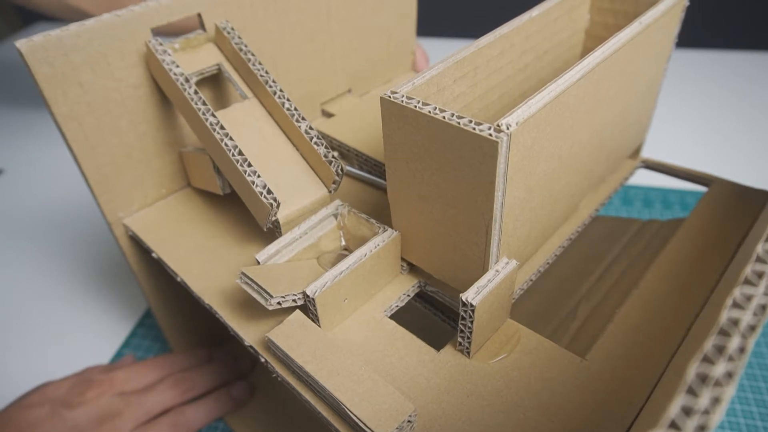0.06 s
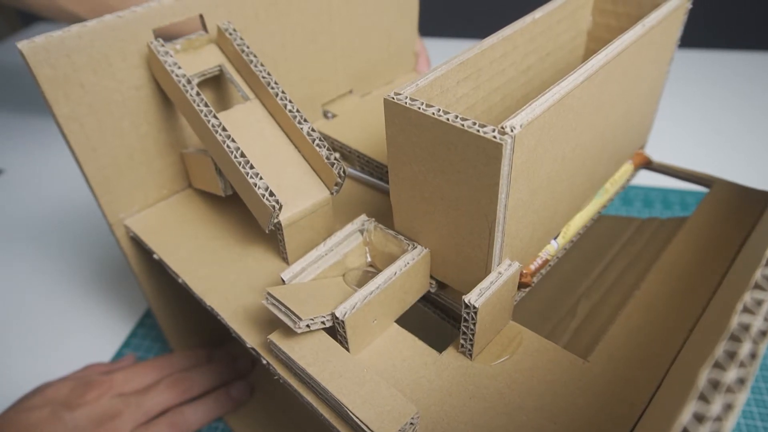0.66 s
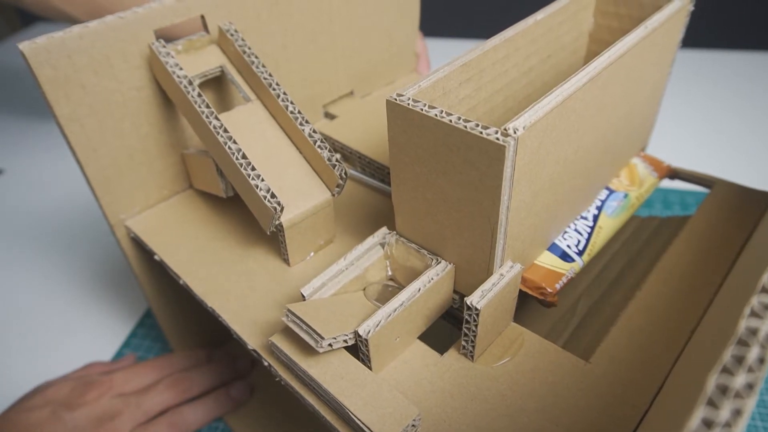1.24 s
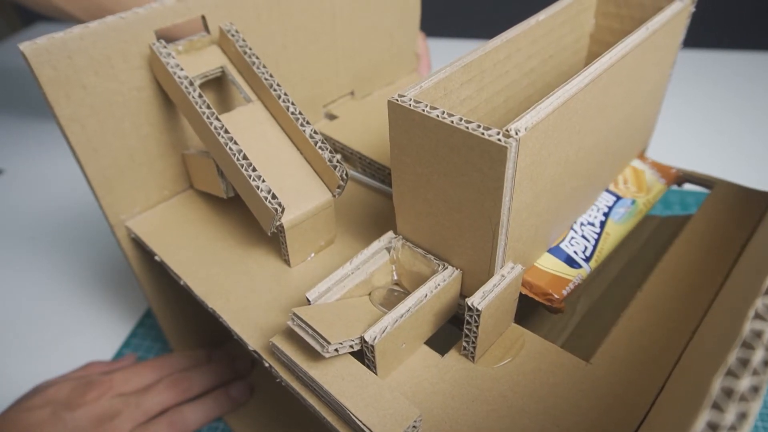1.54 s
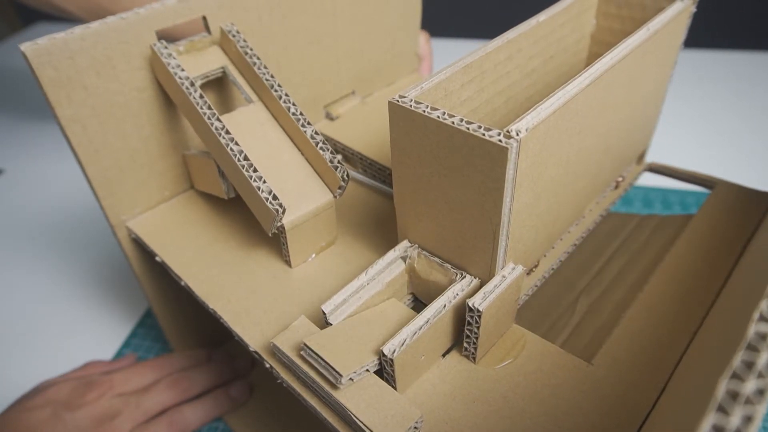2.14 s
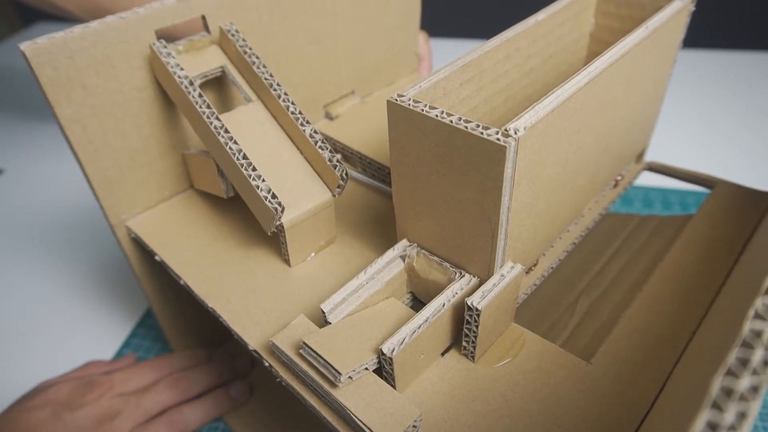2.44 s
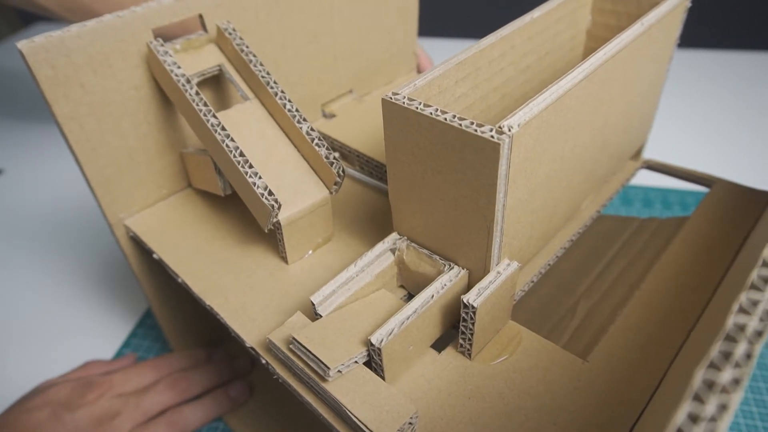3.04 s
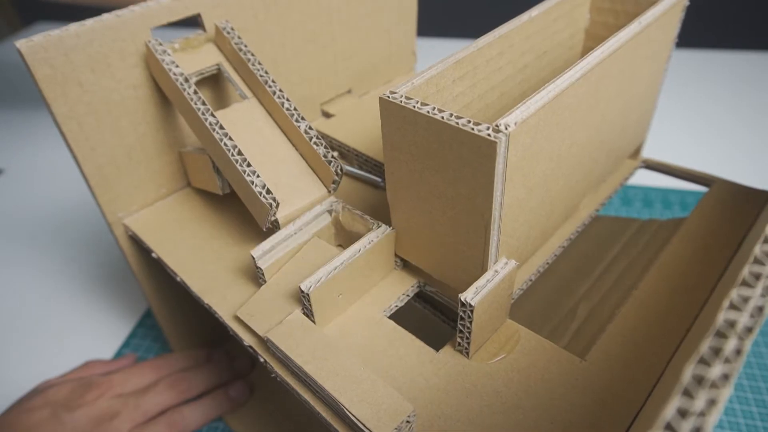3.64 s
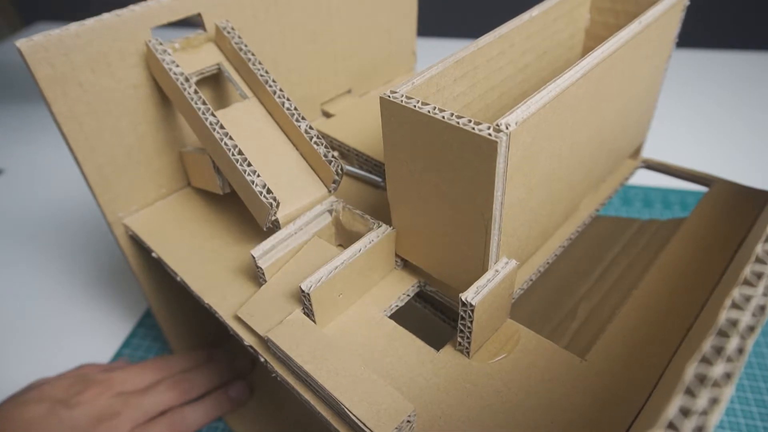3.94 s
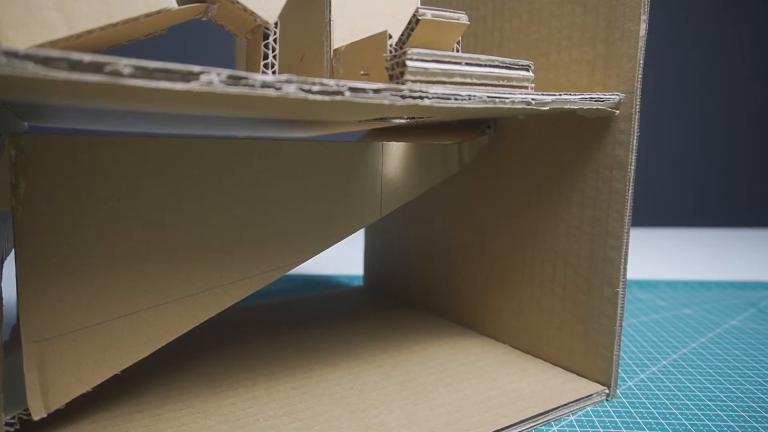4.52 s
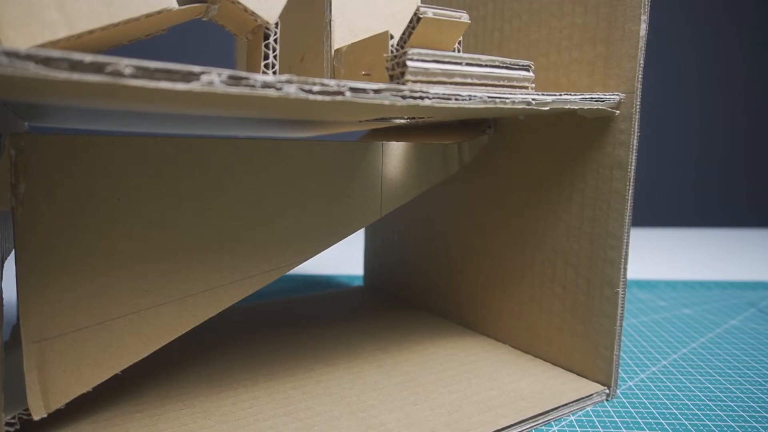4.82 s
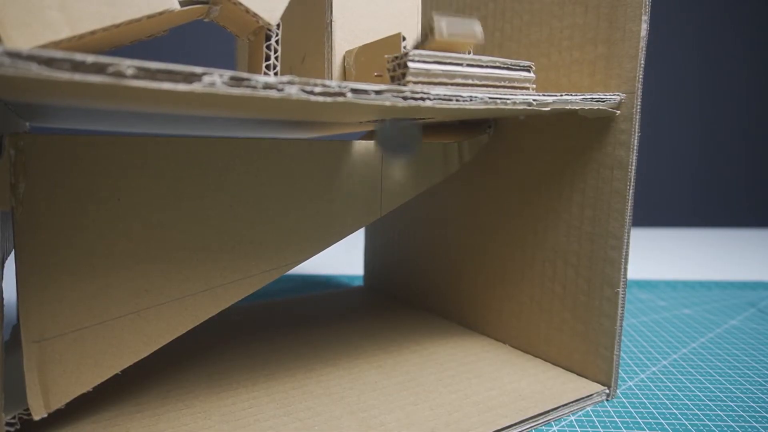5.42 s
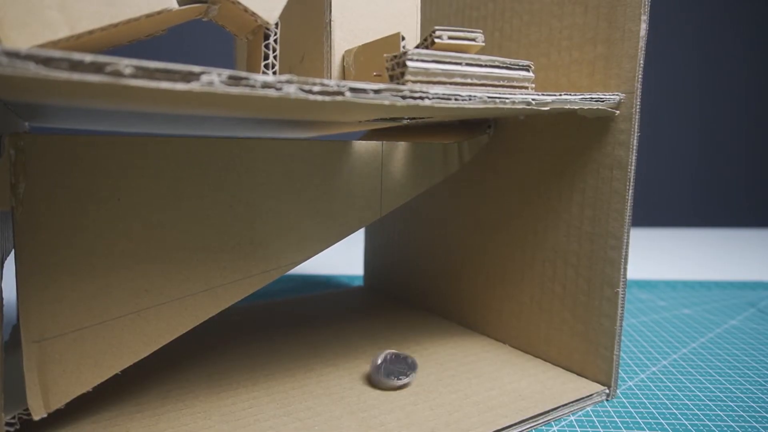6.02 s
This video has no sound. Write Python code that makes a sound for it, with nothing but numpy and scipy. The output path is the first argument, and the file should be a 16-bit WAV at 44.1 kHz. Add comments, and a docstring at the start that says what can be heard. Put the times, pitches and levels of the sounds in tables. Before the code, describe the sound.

Close up, a snack wrapper crackles and snaps against sliding cardboard before the bar falls with a scuffing bump. A coin clacks down and rocks on its rim, followed by the dry scrape and knock of a cardboard slider. Soft taps and rubs lead to the loudest sound, a little left: another coin strikes a hollow cardboard box, spins with a thin ring and clatters down. The small room adds a short echo.

```python
"""Cardboard vending machine

In a small, live room a slider pushes out a wrapped bar, which crinkles and tumbles down. A coin drops
inside and rattles, and the slider scrapes back. In a second part, leaning left, the slider moves
again and a second coin hits the cardboard floor, spins ringing and bounces to rest. Impact and friction
excite the panels' resonances. A limiter ducks the big hits, so the room swells after them."""
import sys
import numpy as np
from scipy import signal
from scipy.fft import rfft, irfft, next_fast_len
from scipy.io import wavfile
from scipy.ndimage import uniform_filter1d, minimum_filter1d

SR = 44100
rng = np.random.default_rng(int(sys.argv[2]) if len(sys.argv) > 2 else 0)


def store_pcm(level_fs):
    """Save levels as 16-bit WAV."""
    pcm = np.round(np.clip(level_fs, -1, 1) * 32767).astype(np.int16)
    wavfile.write(sys.argv[1], SR, np.atleast_2d(pcm).T)


N = 276286

# Levels are relative, before trims and mixing. hardness_hz is the treble limit of a contact.
# second coin on the box floor:
# start_s, level_db, hardness_hz, thump_db, clack_hz, drum_hz, drum_db, low_cut_hz
BOUNCES = [(5.6864, -4.5, 2950, 4, 2300, 290, -6, 160), (5.6879, 2, 2880, -1, 2500, 1040, -3, 170),
           (5.6937, 15.5, 3970, -9, 2840, 314, 11, 230), (5.9465, -11, 6000, 5, 1000, 320, -2, 110),
           (5.9483, -11.5, 3510, 7, 960, 232, -4, 110), (6.0423, -18, 10100, 9, 1760, 250, -2, 100),
           (6.110, -14.5, 5020, 5, 880, 555, 10, 100), (6.1484, -18.5, 13000, 4.5, 4300, 276, -2, 90),
           (6.172, -6.5, 2320, 2, 2400, 537, 3, 540), (6.1931, -13.5, 3830, 1, 925, 550, 5, 360),
           (6.23, -35, 14000, 3, 4130, 540, -3, 299), (6.247, -32, 14000, 0, 4100, 540, -6, 300)]
# impacts on cardboard: start_s, level_db, hardness_hz, thump_db, pitch_hz
COIN_LANDING = [(2.0935, 1.5, 9200, -16, 4360), (2.0968, 2, 7020, 3, 2880), (2.102, -8.5, 910, -3, 373),
                (2.186, -14, 3500, 3, 1300), (2.201, -19.5, 5000, 4, 2850), (2.2192, -22, 2500, 18, 704)]
KNOCKS = [(1.8715, -19.5, 9800, -8, 2870), (3.2485, -16, 6100, -11, 2340), (3.2625, -23, 5000, -3.5, 2140),
          (3.362, -16, 13900, -13.5, 3320), (3.413, -20, 4040, 1, 2110), (3.472, -18.5, 2120, -4, 1630),
          (3.474, -21, 1190, -2, 660), (4.064, -39.5, 6980, 16, 1385), (4.101, -33.5, 5140, 4, 1100),
          (4.197, -46.5, 6030, -6, 4290), (4.783, -31.5, 6240, -17, 4180), (4.843, -46, 7040, -14, 5540),
          (4.896, -41, 7680, -17, 6040), (5.298, -28.5, 6060, -1, 1490), (5.302, -29.5, 5300, 9, 2240),
          (5.335, -34, 4030, -7, 1400), (5.344, -38, 4000, -4, 2300), (5.534, -36.5, 2520, -7, 2270)]
SCUFFS = [(1.777, -23, 6000, -5, 3880), (1.790, -26.5, 8990, -10, 3600), (1.840, -17, 6600, 11, 2400),
          (1.904, -20.5, 6950, 10, 300), (1.919, -23.5, 8960, 12, 230), (2.909, -30.5, 4000, -14.5, 3170),
          (3.344, -21, 3000, 9.5, 880), (3.386, -18.5, 14150, -6.5, 3100)]  # glancing blows that drag a little
# rim of the first coin as it rocks: start_s, level_db, pitch_hz
RIM_CLACKS = [(2.441, -31.5, 1100), (2.462, -30, 900), (2.4732, -21.5, 1370), (2.479, -25.5, 1810),
              (2.5452, -21.5, 1450), (2.562, -19, 1450), (2.586, -29.5, 1800), (2.592, -25, 1300),
              (2.612, -24, 980), (2.619, -27.5, 1150), (2.633, -24.5, 1450), (2.655, -20, 1000),
              (2.673, -22.5, 1400), (2.688, -26.5, 1000), (2.698, -22.5, 880), (2.7096, -20.5, 1800),
              (2.714, -22.5, 1360), (2.744, -21, 1460), (2.765, -23, 1470), (2.7684, -23.5, 1720)]
# free vibration of the coins: pitch_hz, level_db, t60_s
FIRST_COIN_MODES = [(9523, -50, .4), (12559, -45, .45), (12721, -37, .45)]
SECOND_COIN_MODES = [(6272, -38, 1.1), (6374, -37, 1.2), (10524, -48, .6)]
# loud snaps of the plastic wrapper: start_s, level_db, pitch_hz, ring_db, brightness_db
SNAPS = [(0.1835, -31, 7000, 0, 10), (0.311, -30, 6000, 2, 9), (0.444, -25.5, 3380, -6, -4),
         (0.5314, -16, 4980, 9, 7), (0.5322, -17.5, 2450, 8.5, 1), (0.5415, -27, 5200, 5, 18),
         (0.593, -23, 2600, 3, 1), (0.6012, -11.5, 2570, 12, 5), (0.6125, -28, 3900, 11, -2),
         (0.6268, -22.5, 3950, 12, -5), (0.631, -22.5, 2830, 19, -11), (0.6578, -13.5, 3900, 13, -13),
         (0.6925, -16, 3550, -3, 0), (0.7776, -26.5, 6500, 3, -3), (0.957, -36, 2210, 27, -13),
         (1.070, -40, 5430, -2, -3), (1.0943, -42, 2700, 18, -10), (1.285, -44.5, 3180, 18, -9),
         (1.4416, -45.5, 3000, 3, 1), (1.5024, -40, 2970, 5, 0), (1.5995, -33.5, 2700, 4, 0.5),
         (1.6195, -29, 2700, 8, -6), (1.7337, -13, 2400, -1.5, 6.5), (1.801, -23.5, 5200, -1.5, 5.5),
         (1.8075, -27.5, 2770, 1, 2.5), (2.011, -25.5, 2800, 5.5, 1)]
# cardboard creaks: start_s, length_s, level_db, pitch_hz, slip_period_s
CREAKS = [(0.085, 0.17, -40, 1140, 0.0038), (4.51, 0.25, -47.5, 440, 0.014),
          (5.50, 0.088, -43, 2220, 0.0023)]
# envelopes of continuous friction: time_s, rumble_db, hiss_db
COIN_ROLL = [(5.70, -40, -27), (5.79, -23.5, -30.5), (5.87, -33, -38.5), (5.94, -57, -49.5),
             (6.02, -47, -47.5), (6.09, -42, -50), (6.18, -39, -65), (6.26, -45, -53)]
BAR_PUSH = [(0.0, -74, -52.5), (0.16, -68, -49.5), (0.22, -67.5, -52.5), (0.32, -61.5, -49.5),
            (0.41, -64, -56.5), (0.45, -63.5, -47.5), (0.52, -63, -53.5), (0.66, -59, -47),
            (0.74, -62.5, -55), (0.795, -59, -44), (0.85, -60, -54), (0.91, -61.5, -50.5),
            (0.98, -61, -50.5), (1.06, -70.5, -66), (1.284, -71, -68), (1.42, -68, -69)]
BAR_TIP = [(1.42, -79.5, -71.5), (1.63, -58, -47.5), (1.688, -62, -55), (1.72, -61, -42)]
BAR_FALL = [(1.72, -46, -38), (1.76, -46.5, -45.5), (1.89, -41, -45), (1.912, -27, -35),
            (1.95, -39.5, -40.5), (2.08, -62.5, -42), (2.09, -38.5, -31.5)]
SLIDER_BACK = [(3.2, -59, -56), (3.242, -56, -53), (3.248, -39.5, -47), (3.272, -40, -35),
               (3.358, -34.5, -30.5), (3.404, -41, -36.5), (3.45, -46, -59)]
# separate scrapes: start_s, hold_s, rumble_db, hiss_db
BAR_SLIDE = [(2.14, 0.16, -42, -29.5), (2.398, 0.0054, -35.5, -26.5), (2.56, 0.13, -47, -44),
             (2.91, 0.0089, -59, -51), (3.05, 0.12, -70, -59)]
SLIDER_NUDGES = [(4.025, 0.02, -57, -68.5), (4.09, 0.014, -55, -59.5), (4.3, 0.23, -61.5, -75.5),
                 (4.53, 0.25, -60.5, -75), (4.80, 0.11, -63.5, -62), (5.125, 0.0092, -63.5, -71)]
SLIDER_HOME = [(5.236, 0.012, -56, -53), (5.305, 0.013, -47, -47), (5.42, 0.094, -55, -59.5),
               (5.54, 0.018, -49.5, -66)]
# cardboard resonances: pitch_hz, bandwidth_hz, gain_db
FLOOR_MODES = [(188.5, 11, -0.5), (305.5, 29, -5), (560, 120, -9), (986, 42, -6), (1370, 77, -3),
               (1610, 250, -16), (4150, 300, -2)]
PANEL_MODES = [(435, 23, 1.5), (546, 18, -12.5), (651, 83, 0.5), (925, 70, -12), (1440, 260, -10.5),
               (1900, 170, -5.5), (2650, 76, -11), (2870, 250, -6.5), (3850, 88, -7.5), (4640, 44, -3.5)]
CHUTE_MODES = [(1200, 300, 9)]
# spectral envelopes of the impacts, the friction and the room: frequency_hz, gain_db
FLOOR_COLOUR = [(40, -30), (100, -4.5), (200, 4), (330, 0.5), (450, 2), (700, 1), (1700, 1), (2700, 1.5),
                (4200, -4.5), (6000, -6.5), (9500, -8.5), (11500, -16), (14000, -48)]
LANDING_COLOUR = [(80, -43.5), (200, -28), (290, -15.5), (370, -2.5), (540, -4.5), (720, 1), (1050, 1.5),
                  (1500, 0.5), (2200, -3.5), (4200, 0), (7000, -0.5), (11000, -5), (16000, -12.5)]
RATTLE_COLOUR = [(88, -64), (150, -53), (376, -17), (589, -3.5), (637, -5), (702, -12), (880, 1),
                 (1170, -1.5), (1450, -1), (2450, -12), (2980, -5.5), (6640, -12.5), (16000, -28)]
PANEL_COLOUR = [(70, -35.5), (130, -24), (250, -14.5), (450, -5.5), (1300, -1.5), (2200, -2.5),
                (4200, -0.5), (7000, 1.5), (11000, 1.5), (16000, -15.5)]
SNAP_COLOUR = [(120, -60), (200, -30), (500, -19), (1800, -13.5), (2510, -1), (3070, -5.5), (4000, -2.5),
               (5200, -2.5), (6760, -3), (8740, -7), (13100, -6.5), (16000, -15)]
ROLL_COLOUR = [(29, -78), (50, -43), (182, -1.5), (261, -4.5), (312, -1.5), (380, -1.5), (492, -9.5),
               (842, -17.5), (1330, -8), (1980, -6), (5800, -34.5), (7540, -65), (12800, -120)]
PUSH_COLOUR = [(59, -66.5), (100, -33), (174, -36), (315, -17), (433, -13.5), (705, -14.5), (1170, -7.5),
               (1420, -11), (2220, 0.5), (3250, 0.5), (4670, -5), (5080, -4), (9410, -3.5), (14500, -10),
               (16000, -21.5)]
FALL_COLOUR = [(47, -61.5), (80, -46.5), (122, -23), (217, -20.5), (330, 0.5), (440, 0.5), (702, -9),
               (768, -25), (958, -14), (1400, -18), (1990, -19), (2780, -13), (4140, -17.5), (11500, -23),
               (14600, -22), (16000, -35.5)]
SLIDE_COLOUR = [(47, -69), (80, -33.5), (112, -27.5), (259, -18), (431, -1), (493, -6.5), (563, -9),
                (785, -10), (877, -5.5), (1250, -9), (1460, -8.5), (2040, -9.5), (3240, -6.5), (15000, -15),
                (16000, -38)]
BACK_COLOUR = [(47, -77.5), (80, -44), (130, -20.5), (182, -29), (283, -8), (404, -7), (431, 3), (538, -13),
               (1020, -6), (1460, -17.5), (2080, -9), (2270, -9.5), (3870, -14), (10500, -17),
               (16000, -27.5)]
NUDGE_COLOUR = [(29, -62), (50, -28.5), (203, -6.5), (284, -11), (450, -7), (711, -14), (1100, -9),
                (1960, -11), (3670, -7), (6550, -14.5), (10100, -20.5), (13200, -45)]
HOME_COLOUR = [(29, -66), (50, -21), (180, 0.5), (252, -8.5), (408, -16), (586, -8), (783, -11),
               (1400, -7.5), (2270, -5), (2560, -7), (3950, -7), (9870, -18), (12000, -31), (12900, -70),
               (16000, -87)]
ROOM_COLOUR = [(60, 1), (200, 5), (500, 3.5), (1500, -1.5), (4000, -1.5), (8000, -1), (15000, 2.5)]
AIR_COLOUR = [(15, -76), (25, -59), (137, -13.5), (170, -23), (195, -9.5), (242, -18.5), (439, -7.5),
              (2000, -14), (2220, -10.5), (2550, -16), (11000, -31.5), (13000, -48.5), (16000, -54)]
# reverberation time: frequency_hz, t60_s
ROOM_T60 = [(120, 0.4), (400, 0.72), (1000, 0.74), (2800, 0.61), (7000, 0.5), (15000, 0.21)]
# likeness of left and right: frequency_hz, coherence
COHERENCE = [(60, 1), (290, 0.99), (640, 0.9), (1400, 0.79), (3100, 0.61), (7000, 0.38), (15000, 0.68)]
# faint electrical whines: start_s, pitch_hz, level_db
WHINES = [(0, 2230, -81), (4.01, 11780, -80.5)]


def second_coin():
    """Impact and rolling contact: the coin bounces, rings and runs on its rim across the box floor."""
    sound = bounces() + spinning_ring(5.687)
    return sound + friction(COIN_ROLL, ROLL_COLOUR, grains_per_s=7100, judder_db=1,
                            rumble_trim_db=-1, hiss_trim_db=6, modes=FLOOR_MODES)


def bounces(clack_width_hz=420, clack_db=1.5, drum_width_hz=70):
    """Impact on a plate: a sharp clack, and the sheet drums at a pitch set by where the coin lands."""
    out = np.zeros((2, N))
    for row, click in zip(BOUNCES, contacts(len(BOUNCES), scatter=1.45, scatter_t60_s=0.02)):
        start_s, level_db, hardness_hz, thump_db, clack_hz, drum_hz, drum_db, low_cut_hz = row
        force = contact_force(click, hardness_hz, thump_db, thump_hz=780)
        force = butter(force, low_cut_hz, "high")
        modes = [(clack_hz, clack_width_hz, clack_db), (drum_hz, drum_width_hz, drum_db)]
        floor = resonant(coloured(force, FLOOR_COLOUR), modes + list(FLOOR_MODES))
        add(out, start_s, at_level(floor, level_db))
    return out


def spinning_ring(start_s, flutter_hz=19, flutter_db=4, swell_s=5.92, swell_width_s=0.04, swell_db=10):
    """Amplitude modulation: the ring flutters as the faces turn past; its lowest mode swells mid-roll."""
    t = np.arange(N) / SR
    swell = from_db(swell_db * np.exp(-((t - swell_s) / swell_width_s) ** 2))
    flutter = from_db(flutter_db * (np.cos(2 * np.pi * flutter_hz * (t - start_s)) - .5))
    lowest = coin_ring(start_s, SECOND_COIN_MODES[:1])
    upper = coin_ring(start_s, SECOND_COIN_MODES[1:])
    return (lowest * swell + upper) * flutter


def first_coin(rebound_s=0.0086, jitter_s=0.000612, rebound_db=-6):
    """Inelastic collisions: the coin lands inside, rings and rocks; each rim clack rebounds softer."""
    landing = blows(COIN_LANDING, LANDING_COLOUR, scatter=1.6, scatter_t60_s=0.045,
                    thump_hz=900, spot_width_hz=440, spot_db=-3)
    rebounds = [(s + rebound_s + jitter_s * rng.normal(), db + rebound_db, hz)
                for s, db, hz in RIM_CLACKS]
    clacks = [(s, db, 8000, 0, hz) for s, db, hz in list(RIM_CLACKS) + rebounds]  # hard, no added thump
    rattle = blows(clacks, RATTLE_COLOUR, scatter=1, scatter_t60_s=0.046,
                   thump_hz=600, spot_width_hz=440, spot_db=-2)
    return landing + rattle + coin_ring(2.094, FIRST_COIN_MODES)


def coin_ring(start_s, modes):
    """Free vibration of a disc: its modes decay exponentially, and close pairs beat."""
    t, out = np.arange(SR) / SR, np.zeros((2, N))
    ring = sum(from_db(db - 60 * t / t60) * np.sin(2 * np.pi * hz * t) for hz, db, t60 in modes)
    add(out, start_s, ring[None])
    return out


def sliding_bar():
    """Sliding friction: the bar is pushed out, tips over the edge, tumbles down and slides away."""
    push = friction(BAR_PUSH, PUSH_COLOUR, grains_per_s=5000, judder_db=2.5,
                    rumble_trim_db=0.5, hiss_trim_db=2)
    tip = friction(BAR_TIP, PUSH_COLOUR, grains_per_s=5500, judder_db=1.5,
                   rumble_trim_db=0.7, hiss_trim_db=-1.5)
    fall = friction(BAR_FALL, FALL_COLOUR, grains_per_s=5000, judder_db=4,
                    rumble_trim_db=-5.5, hiss_trim_db=-1)
    slide = friction(scrapes(BAR_SLIDE, rise_db_per_s=601, fade_db_per_s=82.5), SLIDE_COLOUR,
                     grains_per_s=25000, judder_db=2.5, rumble_trim_db=-5, hiss_trim_db=-10)
    return push + tip + fall + slide


def wrapper(width_hz=380, overtone_ratio=1.98, overtone_db=-11.5):
    """Buckling: each snap crosses the foil and rings at its own pitch, an overtone and in the chute."""
    out = np.zeros((2, N))
    snaps = list(SNAPS) + crinkles()
    clicks = contacts(len(snaps), scatter=1.5, scatter_t60_s=0.014)
    for (start_s, level_db, hz, ring_db, brightness_db), click in zip(snaps, clicks):
        buckle = coloured(dispersed(click, bend_hz=5960, stages=16), SNAP_COLOUR)
        buckle = buckle + (from_db(brightness_db) - 1) * butter(buckle, 8000, "high", order=1)
        modes = [(hz, width_hz, ring_db), (hz * overtone_ratio, 2 * width_hz, ring_db + overtone_db)]
        add(out, start_s, at_level(resonant(buckle, modes + list(CHUTE_MODES)), level_db))
    return out


def crinkles(per_s=16, above_hiss_db=9, spread_db=6, low_hz=2077, high_hz=6100, ring_db=4):
    """Random buckling under friction: small snaps, louder as the wrapper rubs harder; rows as in SNAPS."""
    time_s, _, hiss_db = np.transpose(list(BAR_PUSH) + list(BAR_TIP))
    slots = np.arange(time_s[0], time_s[-1], 1 / per_s)
    delay, size, pitch = rng.random((len(slots), 3)).T
    starts = slots + delay / per_s
    levels = np.interp(starts, time_s, hiss_db) + above_hiss_db + spread_db * (2 * size - 1)
    pitches = low_hz * (high_hz / low_hz) ** pitch
    return [(s, db, hz, ring_db, 0) for s, db, hz in zip(starts, levels, pitches)]


def slider():
    """Dry friction of cardboard, as two signals: the stroke back, and the later nudges and shoves home."""
    back = friction(SLIDER_BACK, BACK_COLOUR, grains_per_s=24000, judder_db=3,
                    rumble_trim_db=-4, hiss_trim_db=-1.5)
    nudges = friction(scrapes(SLIDER_NUDGES, rise_db_per_s=699.5, fade_db_per_s=52), NUDGE_COLOUR,
                      grains_per_s=10000, judder_db=2, rumble_trim_db=-4.5, hiss_trim_db=-0.5)
    home = friction(scrapes(SLIDER_HOME, rise_db_per_s=598, fade_db_per_s=132), HOME_COLOUR,
                    grains_per_s=15000, judder_db=2.5, rumble_trim_db=-2.3, hiss_trim_db=-4,
                    modes=FLOOR_MODES)
    return back, nudges + home


def knocks_and_scuffs():
    """Direct and oblique impact: a knock is compact, a glancing blow drags into a burst of noise."""
    knocks = blows(KNOCKS, PANEL_COLOUR, scatter=1.3, scatter_t60_s=0.033,
                   thump_hz=500, spot_width_hz=110, spot_db=7.5)
    scuffs = blows(SCUFFS, PANEL_COLOUR, scatter=12, scatter_t60_s=0.08,
                   thump_hz=448, spot_width_hz=700, spot_db=3.5)
    return knocks + scuffs


def creaks(ring_cycles=10, rise_s=0.0016, swell_s=0.027, jitter=0.227, spread_db=7, detune=0.013):
    """Stick-slip: uneven slips pluck a flap for a few cycles; fast slips merge into a rough squeak."""
    t, out = np.arange(6144) / SR, np.zeros((2, N))
    for start_s, length_s, level_db, hz, period_s in CREAKS:
        slips = np.arange(start_s, start_s + length_s, period_s)
        for s, (late, loud, sharp) in zip(slips, rng.standard_normal((len(slips), 3))):
            effort = np.clip(min(s - start_s, start_s + length_s - s) / swell_s, 0, 1)
            decay = from_db(level_db + spread_db * loud - 60 * t * hz / ring_cycles)
            attack = 1 - np.exp(-t / rise_s)
            swing = np.sin(2 * np.pi * hz * (1 + detune * sharp) * t)
            add(out, s + jitter * period_s * late, (effort * decay * attack * swing)[None])
    return out


def friction(envelope, colour, grains_per_s, judder_db, rumble_trim_db, hiss_trim_db, modes=(),
             uneven_db=2, judders_per_s=170, split_hz=1350):
    """Friction noise: fibres catch and let go in dense clicks; the contact hisses, the panels rumble."""
    time_s, rumble_db, hiss_db = np.transpose(envelope)
    t, out = np.arange(time_s[0], time_s[-1], 1 / SR), np.zeros((2, N))
    grip = np.interp((t - t[0]) * judders_per_s, np.arange(1024), rng.standard_normal(1024))
    caught = rng.random(len(t)) < grains_per_s / SR
    sizes = from_db(judder_db * grip + uneven_db * np.minimum(rng.exponential(1, len(t)), 4))
    grains = spread(caught * sizes * rng.standard_normal((2, len(t))))
    rubbing = coloured(dispersed(grains), colour)
    rumble = unit_rms(butter(resonant(rubbing, modes), split_hz, "low", order=4))
    rumble *= from_db(np.interp(t, time_s, rumble_db) + rumble_trim_db)
    hiss = unit_rms(butter(rubbing, split_hz, "high", order=4))
    hiss *= from_db(np.interp(t, time_s, hiss_db) + hiss_trim_db)
    edge_fade = np.clip(np.minimum(t - t[0], t[-1] - t) / 0.0028, 0, 1)
    add(out, time_s[0], (rumble + hiss) * edge_fade)
    return out


def scrapes(rows, rise_db_per_s, fade_db_per_s, lead_s=0.02, tail_s=0.35):
    """Exponential growth and decay: scrapes swell, hold and fade; the loudest sets the envelope."""
    start_s, hold_s, rumble_db, hiss_db = np.transpose(rows)[:, :, None]
    t = np.arange(start_s.min() - lead_s, (start_s + hold_s).max() + tail_s, 0.002)
    shape_db = -rise_db_per_s * np.maximum(start_s - t, 0)
    shape_db -= fade_db_per_s * np.maximum(t - start_s - hold_s, 0)
    return np.transpose([t, np.max(rumble_db + shape_db, axis=0), np.max(hiss_db + shape_db, axis=0)])


def blows(rows, colour, scatter, scatter_t60_s, thump_hz, spot_width_hz, spot_db):
    """Impulse excitation: each struck spot rings at its own pitch and drives the panels' modes."""
    out = np.zeros((2, N))
    clicks = contacts(len(rows), scatter, scatter_t60_s)
    for (start_s, level_db, hardness_hz, thump_db, pitch_hz), click in zip(rows, clicks):
        force = contact_force(click, hardness_hz, thump_db, thump_hz)
        spot = resonant(force, [(pitch_hz, spot_width_hz, spot_db)])
        panels = resonant(coloured(dispersed(spot), colour), PANEL_MODES)
        add(out, start_s, at_level(panels, level_db))
    return out


def contacts(count, scatter, scatter_t60_s, size=6144):
    """Early reflections: each contact is an impulse trailed by scatter between the cardboard walls."""
    t = np.arange(size) / SR
    for noise in rng.standard_normal((count, 2, size)):
        trail = spread(noise) * from_db(-60 * t / scatter_t60_s)
        click = scatter * trail / np.sqrt(np.sum(trail ** 2) / 2)
        click[:, 0] += 1
        yield click


def contact_force(click, hardness_hz, thump_db, thump_hz):
    """Contact compliance: a soft contact loses treble, a flat one thumps."""
    force = butter(click, hardness_hz, "low")
    return force + (from_db(thump_db) - 1) * butter(force, thump_hz, "low", order=1)


def dispersed(x, bend_hz=2600, stages=6):
    """Dispersion: short bending waves outrun long ones, so a click becomes a quick falling chirp."""
    r = np.exp(-2 * np.pi * bend_hz / SR)
    return signal.sosfilt([[-r, 1, 0, 1, -r, 0]] * stages, x + 1e-18)


def resonant(x, modes):
    """Resonance: each mode in turn passes the sound on and adds its own damped ringing."""
    for hz, width_hz, gain_db in modes:
        r = np.exp(-np.pi * width_hz / SR)
        ring = signal.lfilter([1, 0, -1], [1, -2 * r * np.cos(2 * np.pi * hz / SR), r * r], x + 1e-18)
        x = x + from_db(gain_db) * (1 - r * r) / 2 * ring
    return x


def coloured(x, spectrum, size=4096):
    """Minimum-phase filtering: folding the cepstrum gives a causal response with this spectrum."""
    gain = from_db(at_hz(spectrum, np.fft.rfftfreq(size, 1 / SR)))
    cepstrum = irfft(np.log(gain))
    cepstrum[1:size // 2] *= 2
    cepstrum[size // 2 + 1:] = 0
    response = irfft(np.exp(rfft(cepstrum)))[:size // 2]
    return signal.fftconvolve(x, response[None], axes=1)[:, :x.shape[1]]


def spread(pair):
    """Partial coherence: two unrelated signals become left and right, most alike in the bass."""
    size = next_fast_len(pair.shape[1])
    mid, side = rfft(pair, size)
    alike = np.clip(at_hz(COHERENCE, np.fft.rfftfreq(size, 1 / SR)), 0, 1)
    left_right = np.sqrt((1 + alike) / 2) * mid + np.sqrt((1 - alike) / 2) * side * [[1], [-1]]
    return irfft(left_right, size)[:, :pair.shape[1]]


def panned(x, left_db):
    """A level difference between the channels leans a source to the left."""
    return x * from_db(np.array([[left_db], [-left_db]]) / 2)


def butter(x, hz, kind, order=2):
    """Maximally flat, causal low- or high-pass."""
    return signal.sosfilt(signal.butter(order, np.clip(hz, 10, .45 * SR), kind, fs=SR, output="sos"), x)


def at_level(x, level_db, hold_s=0.00046):
    """Equal energy: a blow gets the energy of level_db held for hold_s."""
    return x * from_db(level_db) * np.sqrt(hold_s * SR / np.sum(x ** 2) * 2)


def at_hz(points, hz):
    """Interpolation on a log-frequency axis."""
    frequency_hz, value = np.transpose(points)
    return np.interp(np.log(np.maximum(hz, 1)), np.log(frequency_hz), value)


def from_db(db):
    """Decibels to amplitude ratio."""
    return 10 ** (np.asarray(db) / 20)


def unit_rms(x):
    """Normalisation to unit power."""
    return x / np.sqrt(np.mean(x ** 2) + 1e-20)


def add(out, start_s, x):
    """Superposition of x on out from start_s on."""
    at = int(np.clip(round(start_s * SR), 0, N - 1))
    out[:, at:at + x.shape[1]] += x[:, :N - at]


def room(x, build_s=0.0035):
    """Reverberation: a diffuse field builds up in a few ms and dies soonest in the high treble."""
    t, hz = np.arange(SR) / SR, np.fft.rfftfreq(SR, 1 / SR)
    noise = rfft(spread(rng.standard_normal((2, SR))))
    centres_hz, t60s = np.transpose(ROOM_T60)
    echo = np.zeros((2, SR))
    for share, t60 in zip(np.eye(len(t60s)), t60s):
        band = irfft(noise * at_hz(list(zip(centres_hz, share)), hz), SR)
        echo += band * from_db(-60 * t / t60)
    echo *= 1 - np.exp(-(t / build_s) ** 2)
    echo = coloured(echo / np.sqrt(np.sum(echo ** 2) / 2), ROOM_COLOUR)
    return signal.fftconvolve(x, echo, axes=1)[:, :N]


def background(air_db=-72):
    """Noise floor: broadband room air and the pure tones of thin electrical whines."""
    t = np.arange(N) / SR
    air = from_db(air_db) * unit_rms(coloured(spread(rng.standard_normal((2, N))), AIR_COLOUR))
    return air + sum(from_db(db) * np.sin(2 * np.pi * hz * t) * (t >= s) for s, hz, db in WHINES)


def scene(second_part_s=3.7, low_pass_hz=10500):
    """Direct and reverberant sound: bar, slider and both coins add up in one room."""
    bar = panned(sliding_bar(), 0.3)
    snaps = from_db(-1.1) * wrapper()
    slider_back, slider_in = slider()
    cardboard = knocks_and_scuffs() + creaks()
    second_part = np.arange(N) / SR >= second_part_s
    early = slider_back + cardboard * ~second_part
    # the second part leans left; a steep low-pass cuts the top off its slider, knocks and creaks
    late = butter(slider_in + cardboard * second_part, low_pass_hz, "low", order=10)
    machine = bar + panned(early, 1.2) + panned(late, 4.3) + panned(first_coin(), 0.4)
    coin_box = panned(second_coin(), 1.9)
    echo = room(from_db(-9) * machine + from_db(-12) * snaps + from_db(-11.5) * coin_box)
    return machine + snaps + coin_box + echo + background()


def limiter(x, ceiling_db=-14.5, release_db_per_s=78, window=176):
    """Look-ahead limiting: the gain drops just before a loud hit and recovers at a steady rate."""
    power = uniform_filter1d(np.mean(x ** 2, axis=0), window)
    excess_db = np.maximum(10 * np.log10(np.maximum(power, 1e-12)) - ceiling_db, 0)
    recovery_db = release_db_per_s * np.arange(N) / SR
    cut_db = np.maximum.accumulate(excess_db + recovery_db) - recovery_db
    return x * from_db(uniform_filter1d(minimum_filter1d(-cut_db, window), window))


def record(dry):
    """Amplitude and band limiting: the limiter, clipping at full scale, then a steep low-pass."""
    low_pass = signal.ellip(10, .1, 80, 16200, fs=SR, output="sos")
    return signal.sosfilt(low_pass, np.clip(limiter(dry), -1, 1))


dry = scene()
out = record(dry)
store_pcm(out)
```